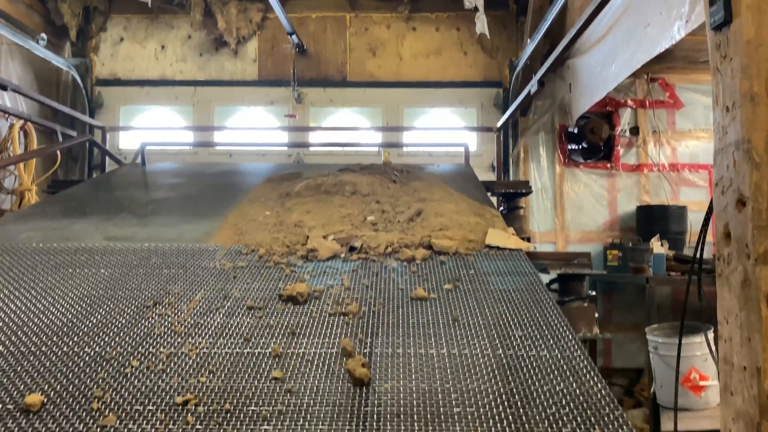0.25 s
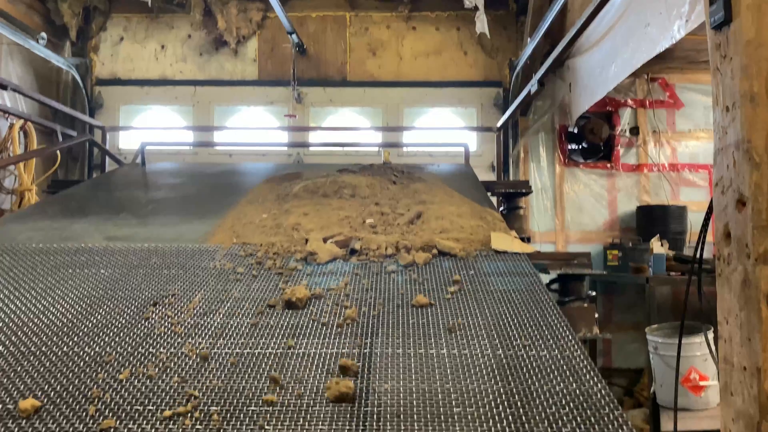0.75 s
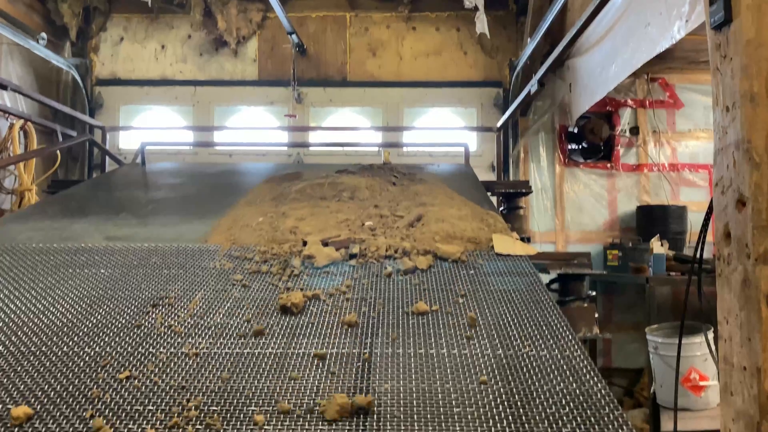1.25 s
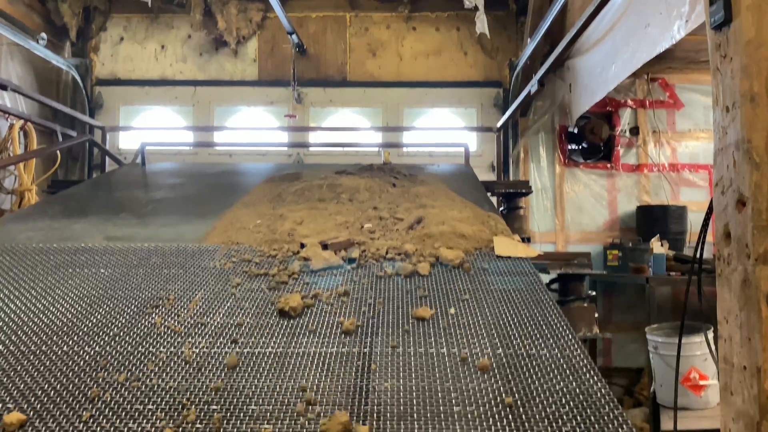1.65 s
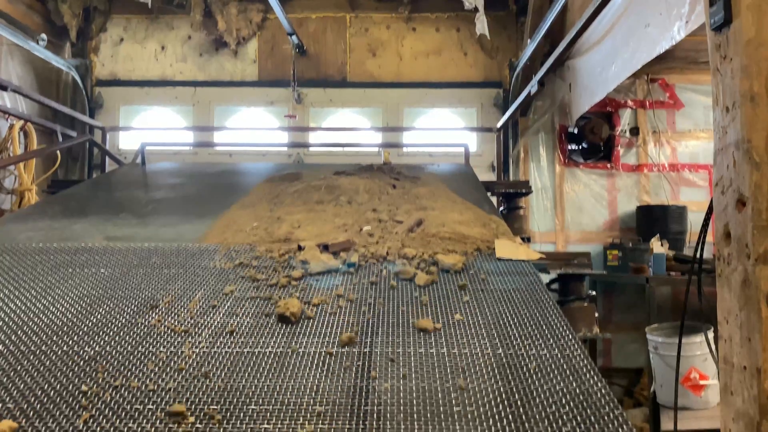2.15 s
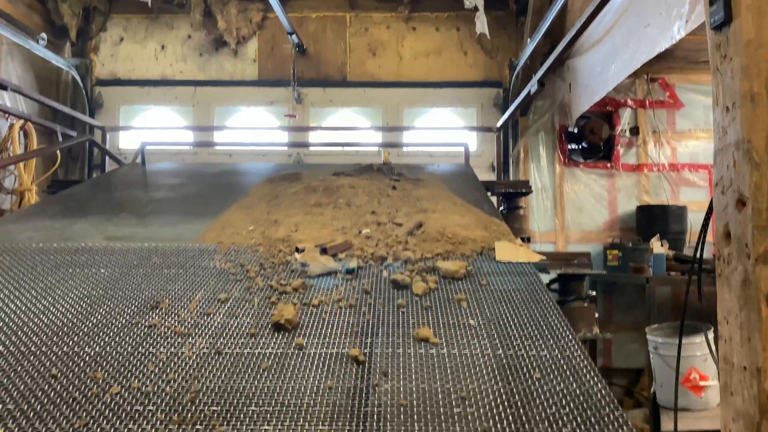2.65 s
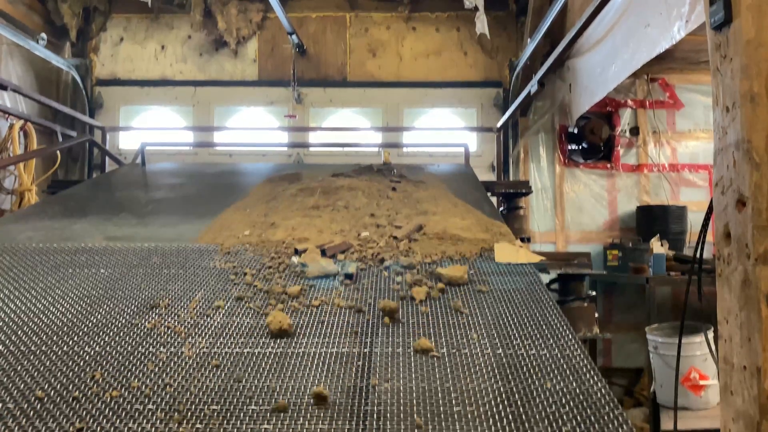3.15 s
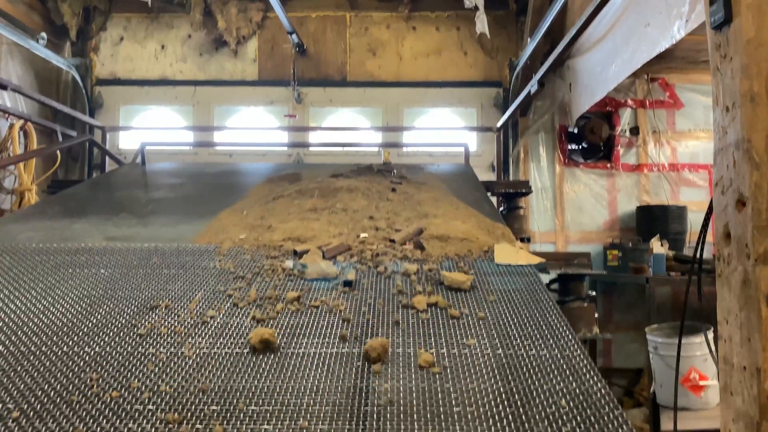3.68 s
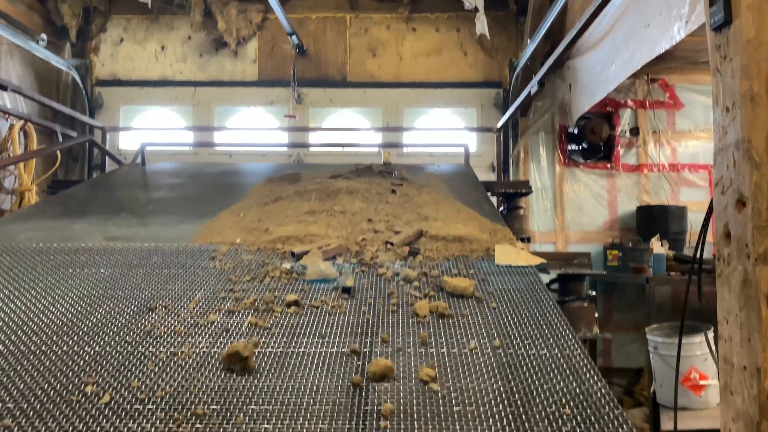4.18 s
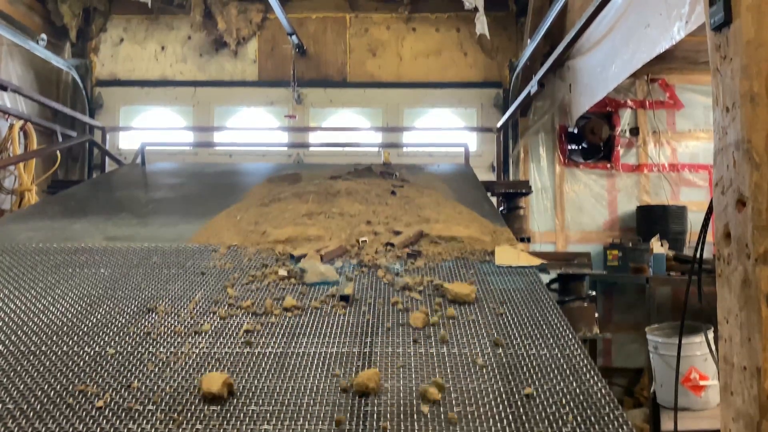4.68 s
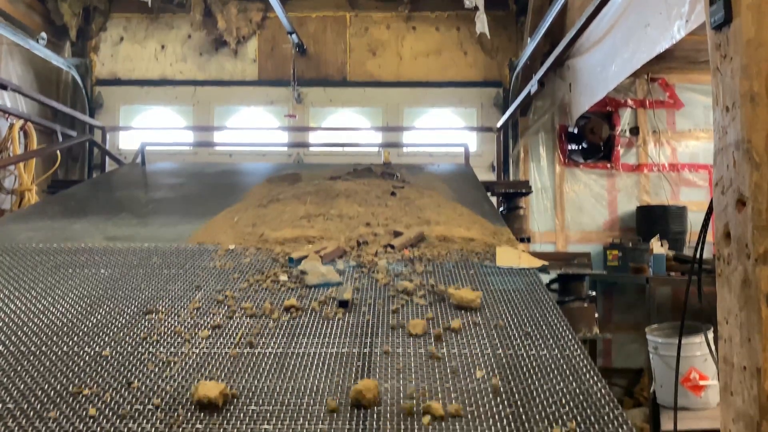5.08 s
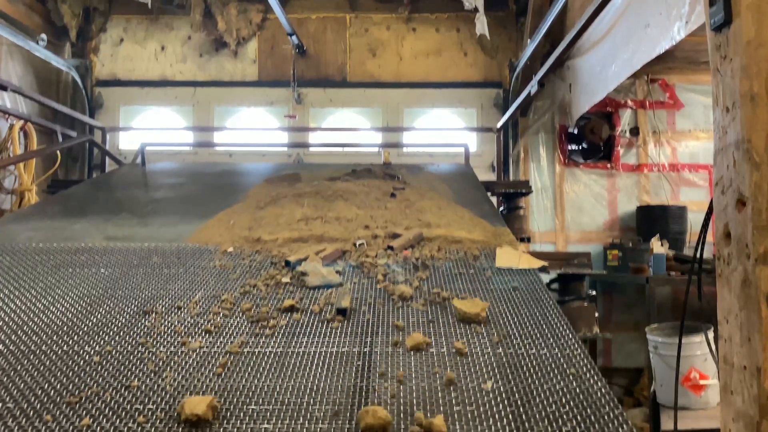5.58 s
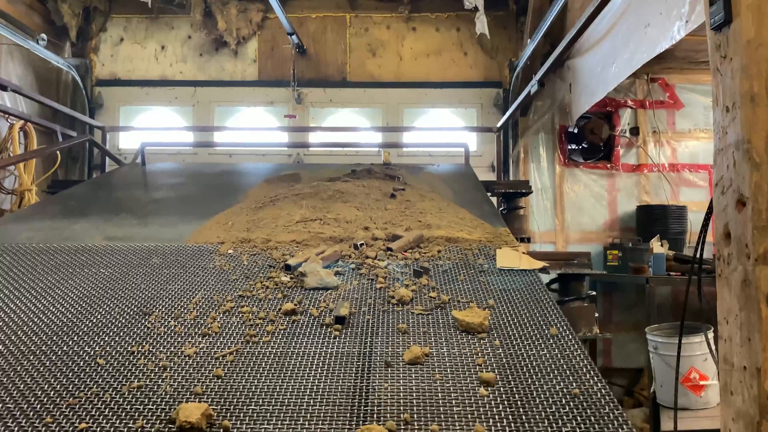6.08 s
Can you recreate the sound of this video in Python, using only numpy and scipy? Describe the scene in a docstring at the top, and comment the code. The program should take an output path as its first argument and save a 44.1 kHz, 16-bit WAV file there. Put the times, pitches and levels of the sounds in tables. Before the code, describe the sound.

Close up in a workshop, a small electric vibrator motor shakes a steel mesh screen. A low, throbbing hum of about twenty-four beats a second carries rough metallic chatter, under a dense, steady wash of gravel ticking on wire. Scattered brighter clacks are stones hopping. It holds nearly constant until just before the end, when the power is cut, the pitch drops and the rattle fades.

```python
"""A vibrator motor shakes a steel mesh screen in a workshop, heard close up.
Each turn of its weight thumps and knocks the frame: a hum of shaft-speed multiples, with bursts of steel chatter.
Gravel is a wash of random ticks ringing through noise tails of the mesh; sparser, brighter clacks are stones.
Near the end the power is cut: the shaft coasts down, resonances swell briefly and the gravel fades."""
import sys
import numpy as np
from scipy import signal
from scipy.fft import rfft, irfft, next_fast_len
from scipy.io import wavfile

SR = 44100
rng = np.random.default_rng(int(sys.argv[2]) if len(sys.argv) > 2 else 0)


def file_out(sig):
    """Save sig as 16-bit WAV at sys.argv[1]."""
    # one column per channel
    cols = np.atleast_2d(sig).T
    # limit, then scale
    lim = np.clip(cols, -1, 1)
    pcm = np.round(lim * 32767).astype(np.int16)
    wavfile.write(sys.argv[1], SR, pcm)


N = 279153
TIME = np.arange(N) / SR  # s

# shaft speed under power: (t/s, speed/turns per minute)
POWERED_SPEED = [(0.0, 1447), (0.6, 1453), (1.05, 1433), (1.4, 1441), (1.7, 1452), (2.0, 1464), (2.6, 1462),
                 (3.2, 1457), (4.0, 1460), (4.6, 1453), (5.2, 1457), (5.75, 1463)]
# shaft speed as it coasts down: (t/s, speed/turns per minute)
COASTING_SPEED = [(5.82, 1401), (5.96, 1377), (6.1, 1112), (6.33, 956)]
# how far the deck has seated itself as the load shifts: (t/s, share seated/0-1)
SEATING_SHARE = [(1.5, 0.02), (1.9, 1)]
# how hard the screen shakes under power; layers follow it in part: (t/s, relative level/dB)
STROKE_LEVEL = [(0, -1.2), (0.55, -3), (1.15, -3.5), (1.85, 2), (2.5, -0.5), (2.9, 2), (4.0, 0.1),
                (4.35, -1.5), (5.75, -3)]
# prominent hum lines, before layer gain:
# (multiple of shaft speed, left level loose/dB, left level seated/dB, right level/dB)
HUM_LINES = [(4, -34.5, -33, -37), (5, -31, -31.5, -45.5), (6, -27, -26.5, -39.5), (7, -36.5, -33, -51),
             (8, -27, -31.5, -47.5), (10, -44, -37.5, -42.5), (11, -47, -46, -48), (12, -43, -39, -46.5),
             (15, -34, -38, -52), (16, -32.5, -33, -50), (18, -44, -34, -48), (20, -32.5, -29, -41),
             (21, -30.5, -33, -42.5), (22, -31, -32, -52), (23, -37, -38, -49), (24, -42, -33, -46),
             (26, -28, -28, -49), (27, -38.5, -36, -46.5), (28, -29.5, -43, -51), (30, -33, -37, -47),
             (32, -44, -40.5, -56), (36, -35, -48, -50), (38, -39, -36, -41), (40, -37, -40, -49),
             (41, -37, -46, -46.5), (42, -39.5, -45, -57), (50, -50, -38, -49)]
# bed of the other hum lines, before layer gain: (f/Hz, level of each line/dB)
HUM_BED_LEVEL = [(73, -55), (220, -38.5), (330, -46.5), (440, -39), (600, -42.5), (720, -45.5), (1100, -49)]
# passing fades and swells of single hum lines: (multiple of shaft speed, t/s, half length/s, level change/dB)
LINE_SWELLS = [(4, 5.5, 0.84, 3.5), (5, 3.7, 0.4, 4), (6, 1.2, 0.3, -4.5), (7, 3.2, 0.41, -9),
               (7, 5.37, 0.47, 4.5), (8, 1.16, 0.22, -9.5), (12, 5.4, 0.83, 4), (15, 5.4, 0.54, -7),
               (16, 3.1, 0.49, -9.5), (16, 4.63, 0.47, 3), (20, 1.1, 0.2, -18), (20, 2.5, 0.23, -8),
               (20, 4, 0.6, 2.5), (21, 2.3, 0.27, -7), (21, 4.5, 0.3, 7), (22, 1.6, 0.17, 6),
               (22, 2.6, 0.35, -8), (22, 5.15, 0.5, 5), (24, 2, 0.86, -1), (26, 2, 0.3, 2.5),
               (26, 5.3, 0.69, -2.5), (27, 3.4, 0.3, 0.5), (27, 4.6, 0.38, -12), (30, 1.03, 0.18, -12),
               (30, 2.4, 0.16, 6.5), (38, 1.2, 0.7, 1), (41, 1.5, 0.37, 5), (50, 4.95, 0.33, 6)]
# blows within one turn, each a damped resonance:
# (loose deck (place in turn/0-1, f/Hz, relative level/dB), seated deck (the same), width/Hz)
TURN_BLOWS = [((0.1005, 130, 0), (0.076, 166, -0.46), 61), ((0.3, 163, 0), (0.29, 176, -5), 80),
              ((0.595, 164, -1.5), (0.57, 201, -3), 48), ((0.0787, 610, -5), (0.0237, 555, 0.5), 140),
              ((0.225, 608, 0.5), (0.31, 570, -2), 125), ((0.54, 539, 2), (0.495, 598, -1.1), 108),
              ((0.695, 585, 0.7), (0.68, 593, 0), 123), ((0.885, 546, -9.5), (0.83, 545, -3.5), 117)]
# wandering main ring of the deck, lower overall as gravel spreads over it: (t/s, f/Hz)
DECK_RING = [(0, 688.2), (.8, 618.8), (1.2, 600), (1.7, 593.2), (2.4, 670.9), (2.9, 538.2), (3.4, 559.9),
             (4.2, 506.3), (5.7, 535)]
# deck panels that uneven knocks set ringing: (f/Hz, width/Hz, relative level/dB)
PANEL_MODES = [(392, 44, -7), (501.6, 35, 2), (530, 44, -4.5), (589.5, 42, -2.5)]
# resonances that swell briefly as the shaft slows: (t/s, f/Hz, half length/s, level/dB)
COAST_SWELLS = [(5.83, 47, 0.032, -41), (5.948, 46.7, 0.03, -44), (6.16, 40, 0.05, -51),
                (5.845, 187, 0.028, -34), (5.937, 146, 0.019, -36), (5.97, 589, 0.037, -37),
                (6.095, 130.4, 0.014, -37), (6.11, 182.6, 0.077, -45), (6.32, 143.6, 0.012, -36)]
# tone of gravel on the wire mesh: (f/Hz, relative level/dB)
GRAVEL_TONE = [(30, -38), (75, -19), (160, -7), (300, -5.5), (550, 0), (780, 0.3), (950, 1.2), (1250, 1.3),
               (1600, -1), (1900, -0.5), (2450, -3), (3700, -0.5), (4400, -1.2), (5400, -6.6), (5800, -11),
               (7000, -17.2), (10500, -23.6), (15000, -38.9)]
# right microphone against the left: (f/Hz, level/dB, likeness/0-1, lag/rad)
RIGHT_EAR = [(53, 14, 0.97, 4.5), (133, -15.5, 0.63, 3.5), (303, 4, 0.19, 0.28), (523, -11, 0.6, -0.4),
             (975, -9, 0.55, -2.5), (1280, -11, 1, -1.5), (1930, -17, 0.27, 1.5), (2600, -15, 0.2, 1),
             (3960, -17, 0.37, 0.5), (5200, -18.5, 0, -8), (6000, -11, 0.7, -4), (10560, 1.5, 1, -11.5),
             (11600, -0.5, 0.94, -13), (15000, 1, 0.9, -18.5)]

POWER_OFF_S, SLUMP_S = 5.803, 0.055  # the power is cut; the stroke then collapses over the slump
REBOUND_S, REBOUND_HALF_S = 5.958, 0.02  # the screen rocks back once on its springs
EDGE_HZ = 15300  # upper edge of the recorder's band


def amp(db):
    """Decibels to gain."""
    return 10 ** (np.asarray(db) / 20)


def unit(x):
    """Scales to rms 1, over all channels together."""
    return x / np.sqrt(np.mean(abs(x) ** 2) + 1e-20)


def curve(rows, order=1):
    """One column of a table, joined by straight lines in time."""
    columns = np.transpose(rows)
    return np.interp(TIME, columns[0], columns[order])


def read(rows, hz, order=1):
    """One column of a table, joined by straight lines in log frequency."""
    columns = np.transpose(rows)
    return np.interp(np.log(hz + 1), np.log(columns[0] + 1), columns[order])


def colour(x, response):
    """Filters by a response given as a function of frequency."""
    size = next_fast_len(N + SR)  # spare room for tails
    spectrum = rfft(x, size) * response(np.fft.rfftfreq(size, 1 / SR))
    return irfft(spectrum, size)[..., :N]


def drift(rate_hz, count=512):
    """Complex random wander of rms 1, with its fast motion smoothed away."""
    hz = np.fft.fftfreq(count, N / SR / count)
    noise = rng.standard_normal(count) + 1j * rng.standard_normal(count)
    smooth = np.fft.ifft(np.fft.fft(noise) / (1 + (hz / rate_hz) ** 2))
    return np.interp(TIME, np.linspace(0, N / SR, count), unit(smooth))


def resonance(hz, centre_hz, width_hz):
    """Response of one damped mode, 1 at its centre."""
    return 1j * hz * width_hz / (centre_hz ** 2 - hz ** 2 + 1j * hz * width_hz)


def bump(s, half_length):
    """A smooth rise to 1 at time s and a fall back."""
    return np.exp(-.5 * ((TIME - s) / half_length) ** 2)


def coasted_s():
    """Seconds since the power was cut, 0 before."""
    return np.maximum(TIME - POWER_OFF_S, 0)


def seated_share():
    """How far the deck has seated itself, 0-1 over time."""
    return np.clip(curve(SEATING_SHARE), 0, 1)


def microphones(near, diffuse):
    """The left hears the near sound; the right mixes it, delayed and shaded by pitch, with the diffuse room."""
    def likeness(hz):
        return np.clip(read(RIGHT_EAR, hz, order=2), 0, 1)

    def level(hz):
        return amp(read(RIGHT_EAR, hz))

    direct = colour(near, lambda hz: level(hz) * likeness(hz) * np.exp(-1j * read(RIGHT_EAR, hz, order=3)))
    room = colour(diffuse, lambda hz: level(hz) * np.sqrt(1 - likeness(hz) ** 2))
    return np.array([near, direct + room])


def effort(level_db, follow, slump_db, fade_db_per_s, rebound_db):
    """Gain that follows the stroke, slumps when the power is cut, rebounds once and dies away."""
    powered_db = level_db + follow * curve(STROKE_LEVEL)
    coasting_db = slump_db * np.minimum(coasted_s() / SLUMP_S, 1) + fade_db_per_s * coasted_s()
    return amp(powered_db + coasting_db + rebound_db * bump(REBOUND_S, REBOUND_HALF_S))


def rattle():
    """The load barely follows the stroke, drops when the power is cut and then settles steadily."""
    return effort(level_db=-0.67, follow=0.12, slump_db=-4.5, fade_db_per_s=-25.0, rebound_db=1.0)


def forces():
    """The frame's thump follows the stroke closely; the deck's knock less so, but it dies faster without power."""
    thump = effort(level_db=-0.14, follow=0.59, slump_db=-5.0, fade_db_per_s=-2, rebound_db=3.5)
    knock = effort(level_db=-0.5, follow=0.28, slump_db=-5.5, fade_db_per_s=-13.0, rebound_db=4.0)
    return thump, knock


def force(hz, thump, knock):
    """Low notes follow the thump of the frame, higher ones the knock of the deck."""
    high = np.clip((hz - 200) / 180, 0, 1)
    return (1 - high) * thump + high * knock


def rumble(level_db=-40, centre_hz=150, width_hz=110, fade_db_per_s=-1):
    """The frame rumbles as resonant noise between the blows, and outlasts the hum when the power is cut."""
    noise = rng.standard_normal((2, N))
    noise = unit(colour(noise, lambda hz: resonance(hz, centre_hz, width_hz) ** 3))
    return amp(level_db + fade_db_per_s * coasted_s()) * microphones(*noise)


def strikes(turns, per_s, spread_db, bunching):
    """Ticks of random level and sign land on the wire, a little more often as the deck comes up."""
    chance = per_s / SR * (1 + bunching * np.cos(2 * np.pi * (turns - .15)))
    size = amp(spread_db * np.minimum(rng.exponential(1, N), 4))
    return size * rng.choice([-1., 1.], N) * (rng.random(N) < chance)


def mesh(hits, t60, wet_db, size=8192):
    """One patch of wire: a sharp tick, then the dense noise ring of the mesh and the workshop."""
    ring = rng.standard_normal((2, size)) * amp(-60 * TIME[:size] / t60)
    ring *= amp(wet_db) / np.linalg.norm(ring, axis=1, keepdims=True)
    ring[1] *= np.sqrt(1 + amp(-wet_db) ** 2)  # the diffuse sound has no tick, so its ring makes up the energy
    ring[0, 0] += 1
    return signal.oaconvolve(hits[None], ring, axes=1)[:, :N]


def stones(turns, level_db=-33, lowest_hz=1500, count=3):
    """Stones hop on the mesh: sparser hits with a shorter ring and less bass clack out of the wash."""
    hops = 0
    for _ in range(count):
        hits = strikes(turns, per_s=45, spread_db=2.0, bunching=0.18)
        hops = hops + mesh(hits, t60=0.078, wet_db=-1.0)
    sound = unit(colour(hops, lambda hz: amp(read(GRAVEL_TONE, hz)) * hz / (hz + lowest_hz)))
    return amp(level_db) * microphones(*(sound * rattle()))


def gravel(turns, level_db=-19.0, surge_db=0.06, clump_db=0.37, count=8):
    """Thousands of small grains a second on several patches of mesh; slow wander makes the wash gently uneven."""
    patches = 0
    for _ in range(count):
        hits = strikes(turns, per_s=800, spread_db=2.5, bunching=0.12)
        patch = mesh(hits, t60=0.12, wet_db=5.5)
        patches = patches + patch * amp(surge_db * drift(rate_hz=2.3).real)
    sound = unit(colour(patches, lambda hz: amp(read(GRAVEL_TONE, hz))))
    sound = sound * amp(clump_db * drift(rate_hz=4.8).real)
    return amp(level_db) * microphones(*(sound * rattle()))


def shudder(rough=1.0, rough_hz=18):
    """The coasting screen rocks on its springs and single panels ring up briefly, as roughened tones."""
    out = np.zeros((2, N))
    for s, hz, half_length, db in COAST_SWELLS:
        swell = amp(db) * bump(s, half_length)
        wave = np.exp(2j * np.pi * hz * TIME) * (1 + rough * drift(rough_hz))
        tone = np.sqrt(2) * swell * wave.real
        out += [tone, tone * amp(min(read(RIGHT_EAR, hz), 0))]
    return out


def blows(order):
    """The blows of the loose (0) or seated (1) deck, as (place, Hz, width Hz, dB)."""
    found = []
    for *states, width in TURN_BLOWS:
        place, hz, db = states[order]
        found.append((place, hz, width, db))
    return found


def moving_blows():
    """Each blow shifts in the turn and changes strength as the deck seats: (place, Hz, width Hz, dB)."""
    seated, moving = seated_share(), []
    for loose, settled in zip(blows(order=0), blows(order=1)):
        loose_place, _, _, loose_db = loose
        place, hz, width, db = settled
        moving.append((loose_place + seated * (place - loose_place), hz, width,
                       loose_db + seated * (db - loose_db)))
    return moving


def throb(turns, level_db=-30.0, alternation=0.7):
    """The load bounces: random knock strengths, each leaning against the one before, ring the deck panels."""
    knocks = np.zeros((2, N))
    for place, hz, width, db in moving_blows():
        if hz > 300:
            at = np.flatnonzero(np.diff(np.floor(turns - place)) > 0)
            chance = rng.uniform(-1, 1, size=(2, 200))[:, :len(at)]
            knocks[:, at] += amp(db[at]) * (chance - alternation * np.roll(chance, 1, axis=1))

    def panels(f):
        return sum(amp(db) * resonance(f, hz, width) ** 2 for hz, width, db in PANEL_MODES)

    ringing = unit(colour(knocks, panels))
    _, knock = forces()
    return amp(level_db) * microphones(*(ringing * knock))


def chatter(turns, level_db=-29.5, deck_db=5.5, spread=0.054, follow=0.4):
    """Loose steel chatters in a fresh noise burst at each blow; knocks above 300 Hz glide with the deck's ring."""
    out, drive, deck_hz = np.zeros((2, N)), forces(), curve(DECK_RING)
    glide = np.exp(2j * np.pi * np.cumsum(follow * (deck_hz - deck_hz.mean())) / SR)
    for place, hz, width, db in moving_blows():
        from_blow = (turns - place + .5) % 1 - .5  # in turns
        burst = np.exp(-.5 * (from_blow / spread) ** 2) * rng.standard_normal((2, N))
        ring = unit(colour(burst, lambda f: resonance(f, hz, width * 1.7) ** 2))
        if hz > 300:
            analytic = signal.hilbert(ring, next_fast_len(N))[:, :N]
            ring = amp(deck_db) * (analytic * glide).real  # shifts the pitch
        out += amp(db) * force(hz, *drive) * ring
    return amp(level_db) * microphones(*unit(out))


def sway(turns, left_db=-41, right_db=-41.0, lag=-2.63):
    """The whole screen pumps the air: a clean note at twice the shaft speed that stops soon after the power."""
    powered = np.clip(1 - (TIME - POWER_OFF_S) / SLUMP_S, 0, 1)
    angle = 4 * np.pi * turns
    left, right = amp(left_db) * np.cos(angle), amp(right_db) * np.cos(angle - lag)  # lag in rad
    return np.sqrt(2) * powered * np.array([left, right])


def hum_lines(shaft_hz, right_db=-8, count=48):
    """Multiples of the shaft speed at the level of the bed, except those that stand out."""
    lines = {k: read(HUM_BED_LEVEL, k * shaft_hz) + np.array([0, 0, right_db]) for k in range(3, count)}
    lines.update({round(row[0]): row[1:] for row in HUM_LINES})
    return lines


def timing(k, hz, order):
    """The phase that the blows of one turn give to multiple k of the shaft speed."""
    total = sum(amp(db) * resonance(hz, centre_hz, width) * np.exp(-2j * np.pi * k * place)
                for place, centre_hz, width, db in blows(order))
    return total / abs(total)


def frame_hum(turns, level_db=0.52, waver=0.23, waver_hz=1.0):
    """The blows repeat every turn, so the frame sounds multiples of the shaft speed, timed by the blows."""
    seated, out = seated_share(), np.zeros((2, N))
    shaft_hz, drive = turns[-1] / TIME[-1], forces()  # mean speed places the lines on the tables
    for k, (loose_db, seated_db, right_db) in hum_lines(shaft_hz).items():
        hz = k * shaft_hz
        before = (1 - seated) * timing(k, hz, order=0)
        after = seated * timing(k, hz, order=1)
        line = np.sqrt(2) * np.exp(2j * np.pi * k * turns) * force(hz, *drive)
        line *= amp(sum(db * bump(s, half) for multiple, s, half, db in LINE_SWELLS if round(multiple) == k))
        line *= 1 + waver * np.sqrt(hz / 550) * drift(waver_hz)  # the moving load unsettles high lines most
        out[0] += (line * (amp(loose_db) * before + amp(seated_db) * after)).real
        lag = np.exp(-1j * read(RIGHT_EAR, hz, order=3))
        out[1] += amp(right_db) * (line * (before + after) * lag).real
    return amp(level_db) * out


def coasting_hum(turns, fade_db_per_s=-38):
    """Without power the blows soften, and the hum dies sooner than the rattle."""
    return frame_hum(turns) * amp(fade_db_per_s * coasted_s())


def scene():
    """One shaft, powered and then coasting, is the clock for the machine and the load it shakes."""
    turns_per_minute = curve(list(POWERED_SPEED) + list(COASTING_SPEED))
    turns = np.cumsum(turns_per_minute) / 60 / SR
    machine = sway(turns) + coasting_hum(turns) + rumble() + chatter(turns) + throb(turns) + shudder()
    return machine + gravel(turns) + stones(turns)


def record(dry):
    """The recorder's band limit, a steep low-pass."""
    low_pass = signal.firwin(511, EDGE_HZ, window=("kaiser", 9), fs=SR)
    return signal.oaconvolve(dry, low_pass[None], "same")


dry = scene()
out = record(dry)
file_out(out)
```